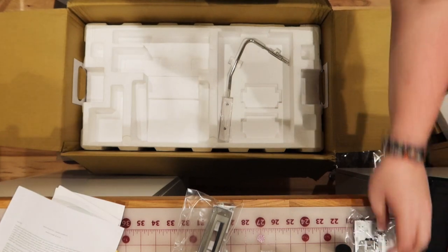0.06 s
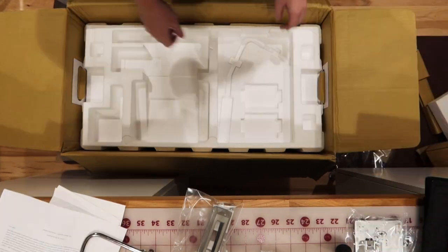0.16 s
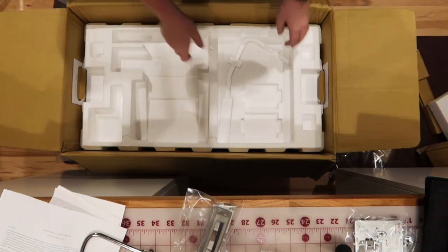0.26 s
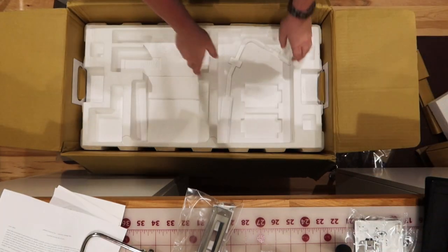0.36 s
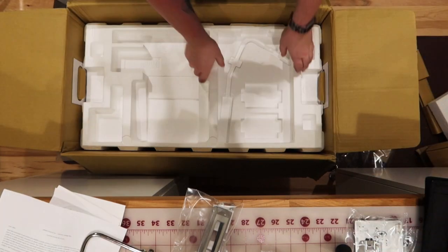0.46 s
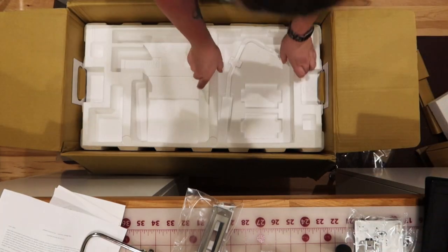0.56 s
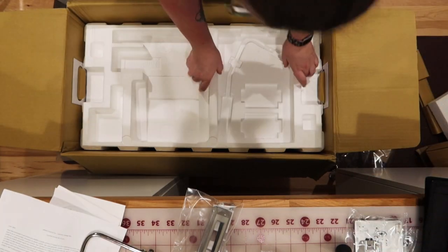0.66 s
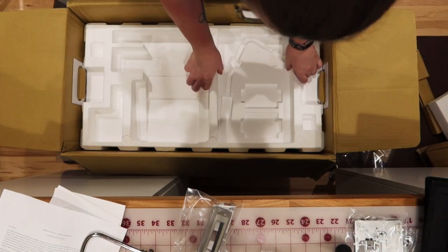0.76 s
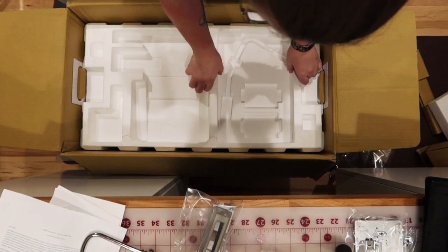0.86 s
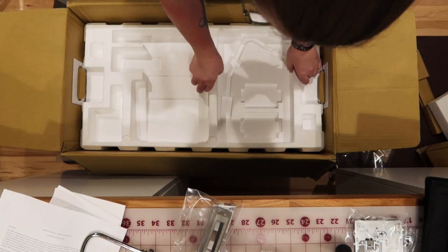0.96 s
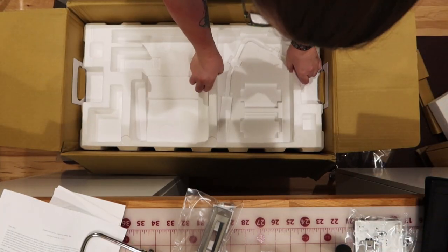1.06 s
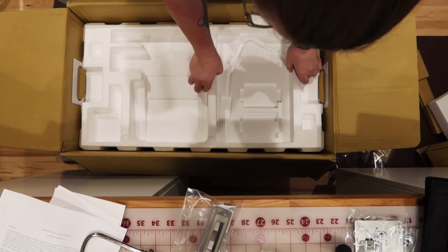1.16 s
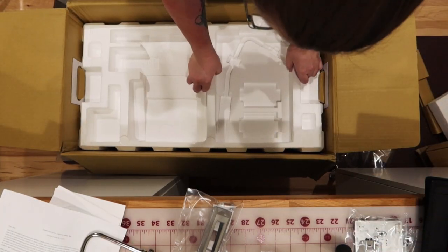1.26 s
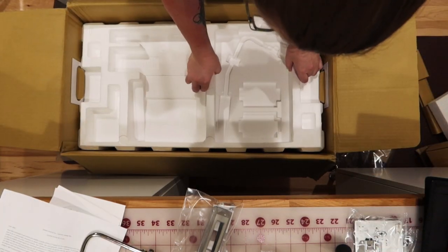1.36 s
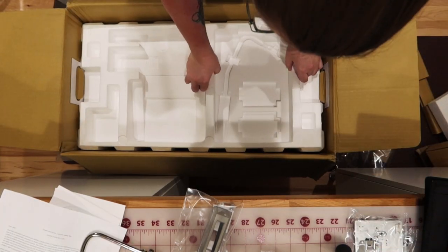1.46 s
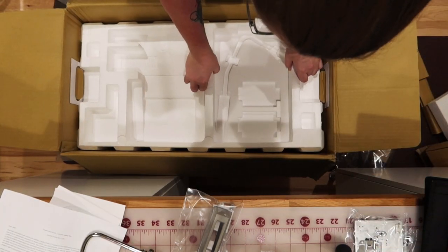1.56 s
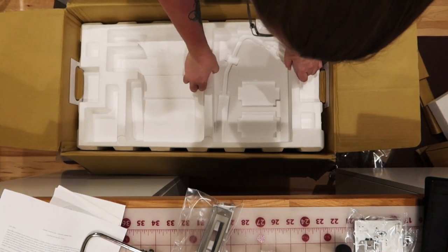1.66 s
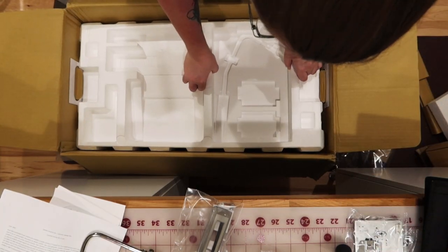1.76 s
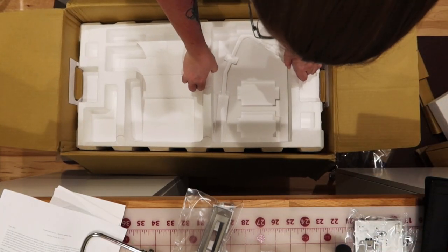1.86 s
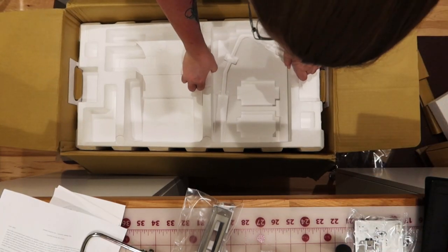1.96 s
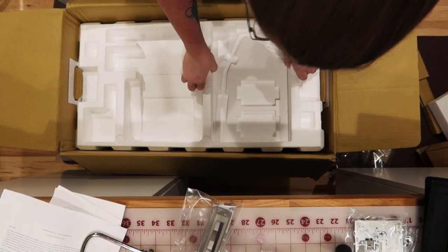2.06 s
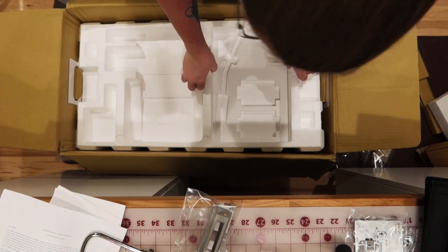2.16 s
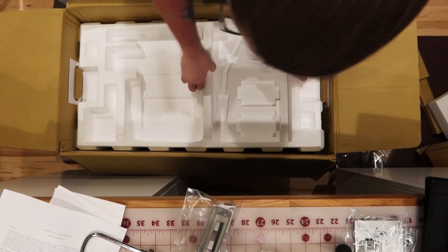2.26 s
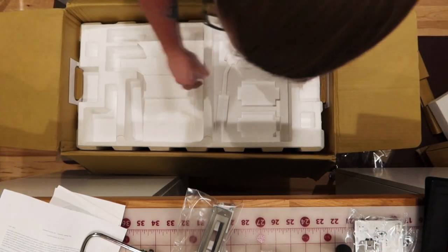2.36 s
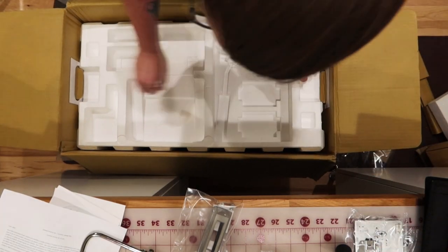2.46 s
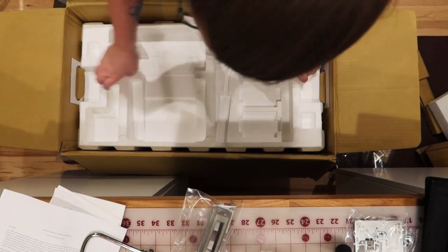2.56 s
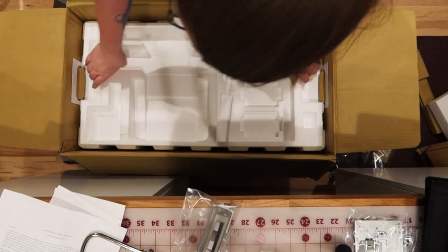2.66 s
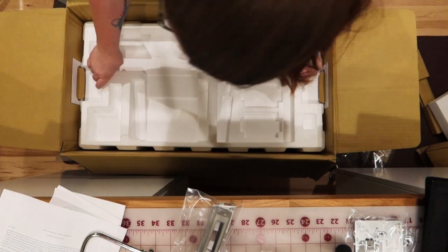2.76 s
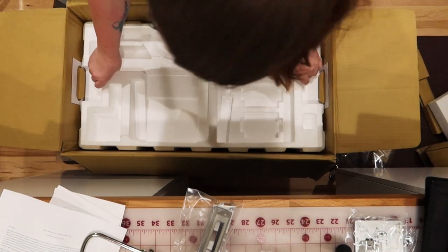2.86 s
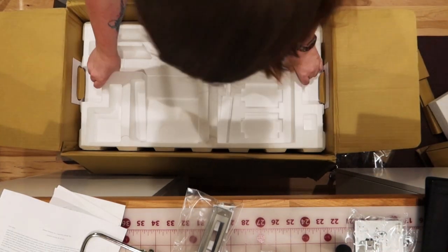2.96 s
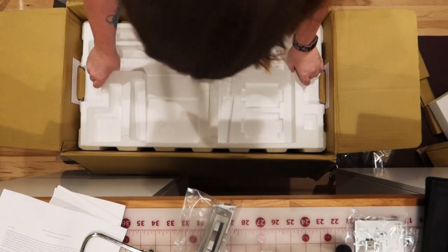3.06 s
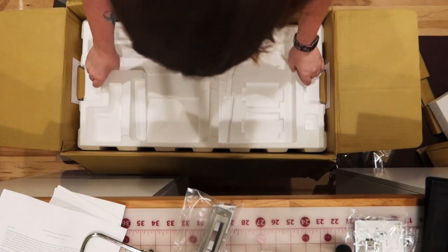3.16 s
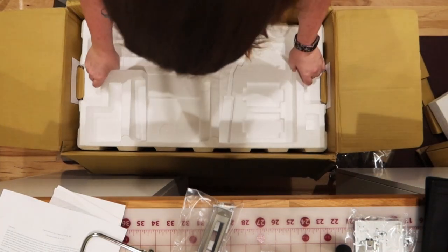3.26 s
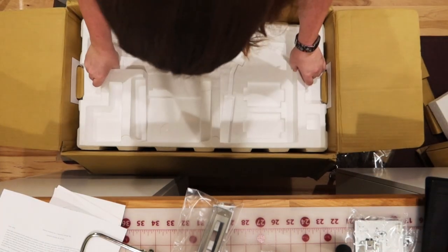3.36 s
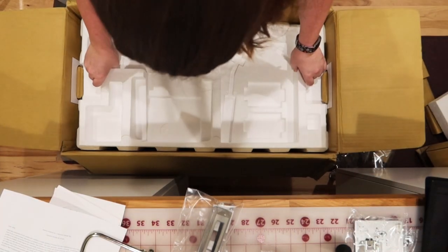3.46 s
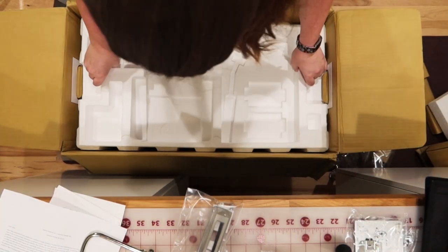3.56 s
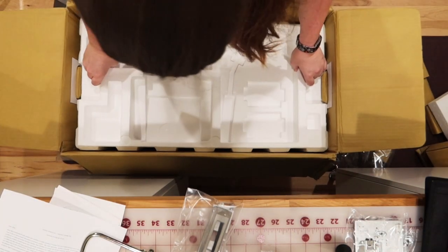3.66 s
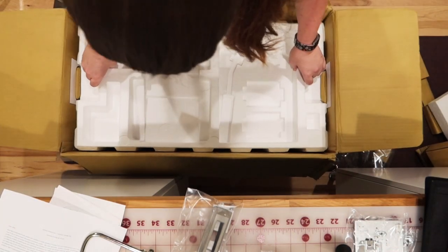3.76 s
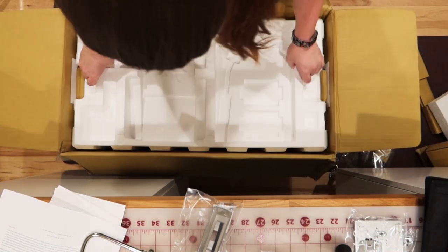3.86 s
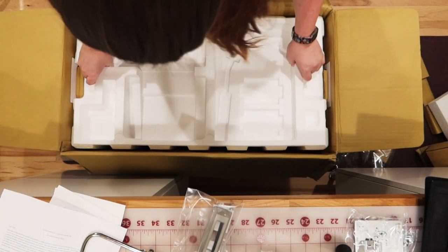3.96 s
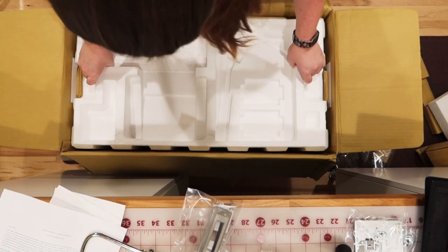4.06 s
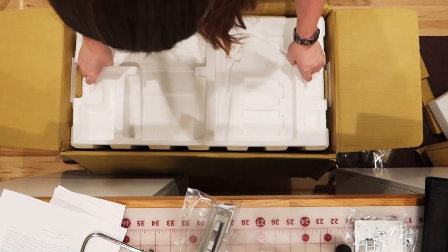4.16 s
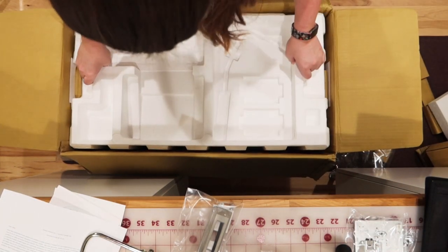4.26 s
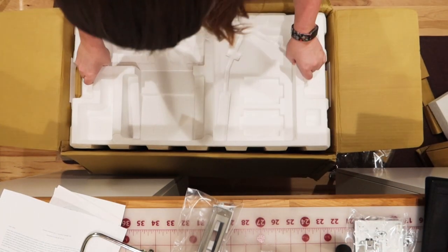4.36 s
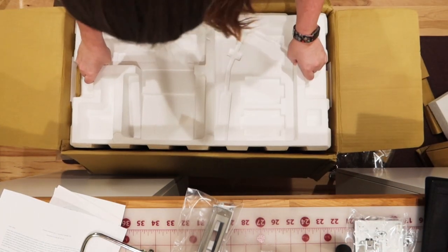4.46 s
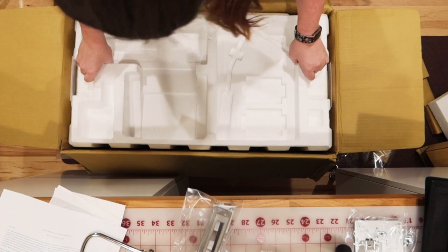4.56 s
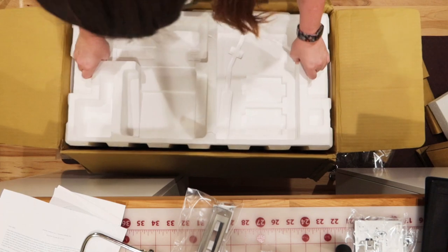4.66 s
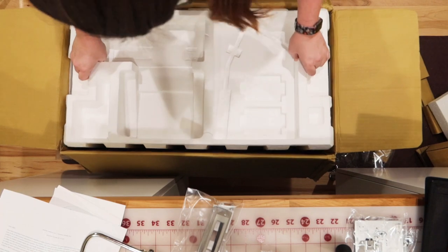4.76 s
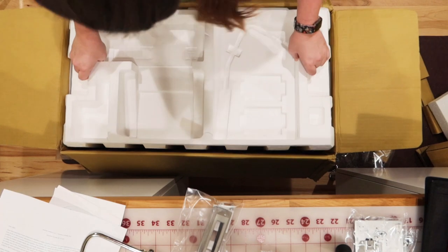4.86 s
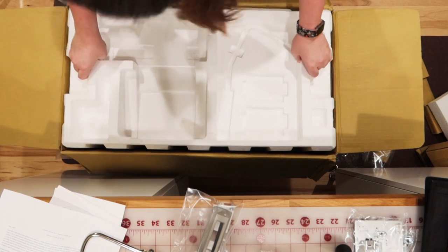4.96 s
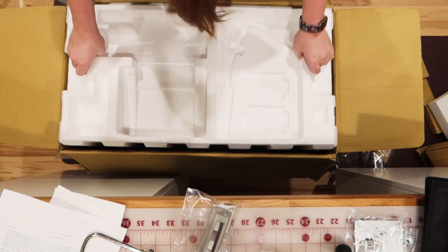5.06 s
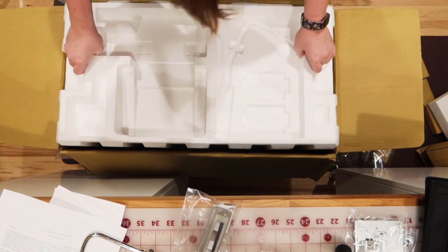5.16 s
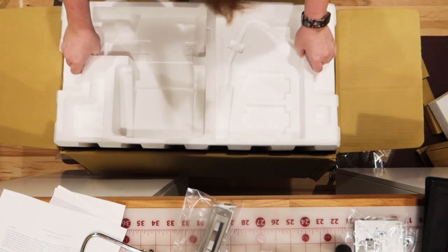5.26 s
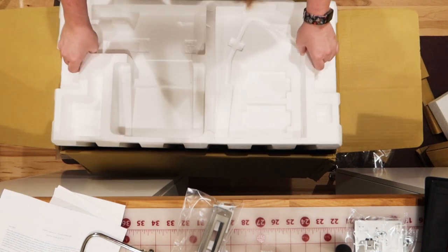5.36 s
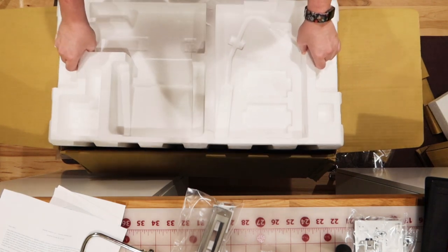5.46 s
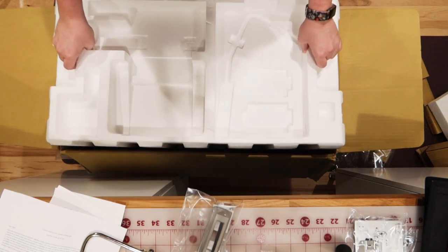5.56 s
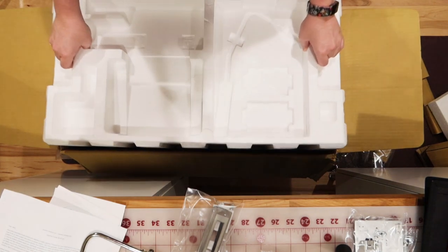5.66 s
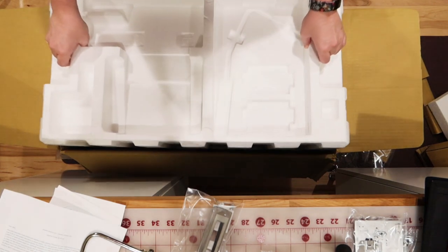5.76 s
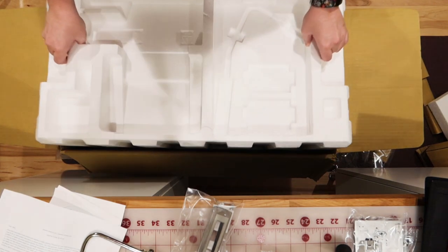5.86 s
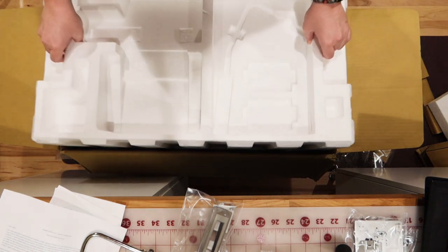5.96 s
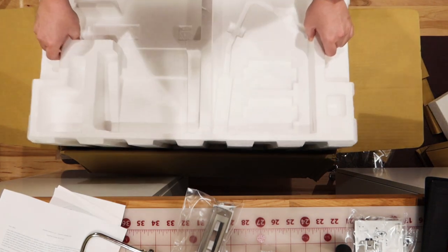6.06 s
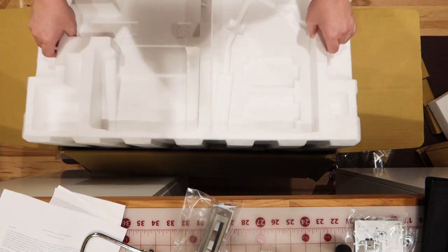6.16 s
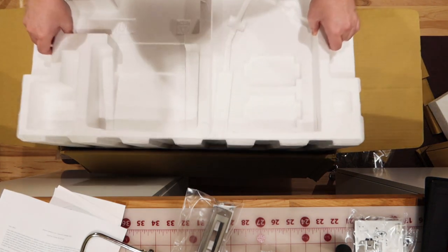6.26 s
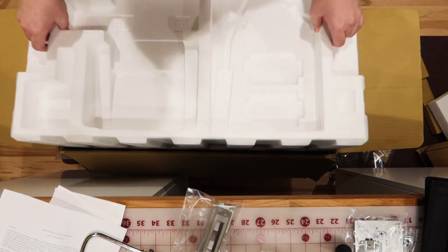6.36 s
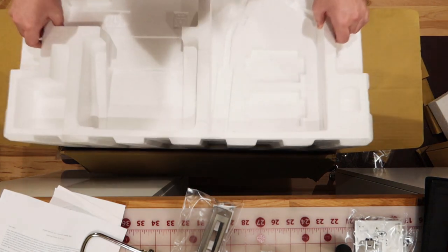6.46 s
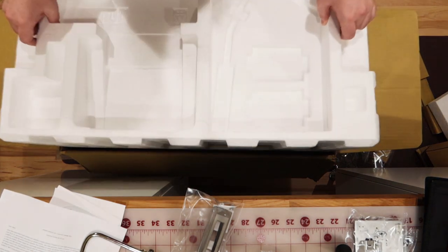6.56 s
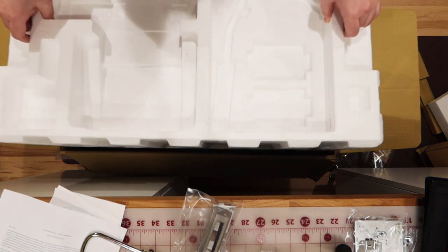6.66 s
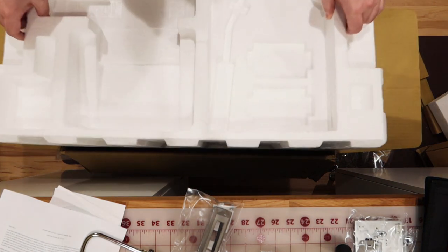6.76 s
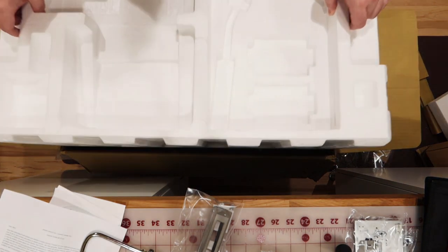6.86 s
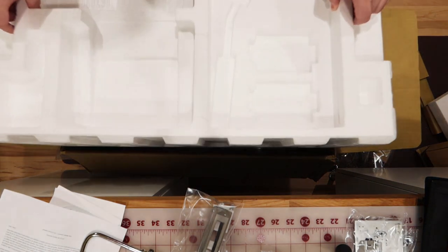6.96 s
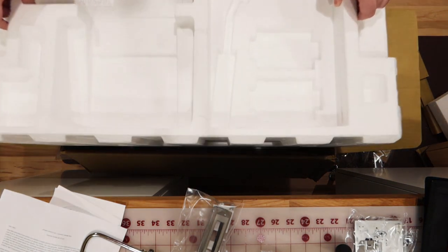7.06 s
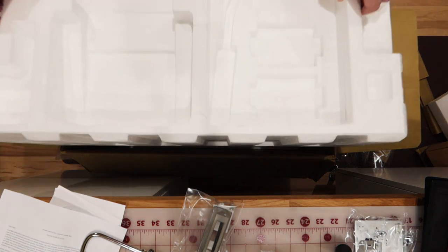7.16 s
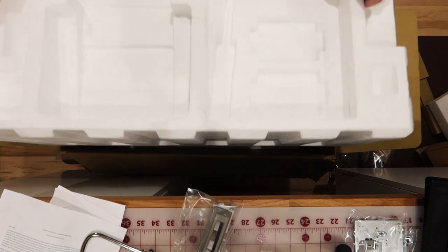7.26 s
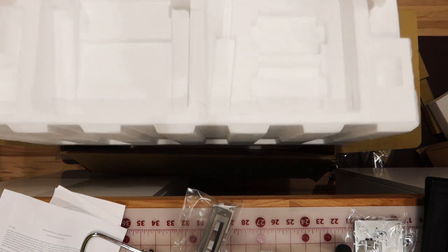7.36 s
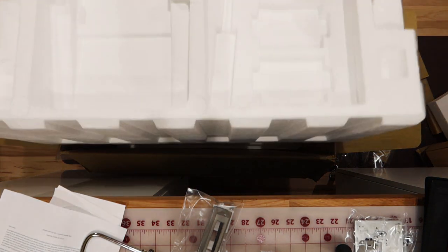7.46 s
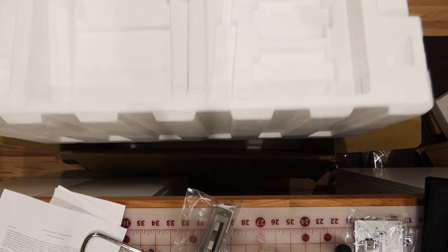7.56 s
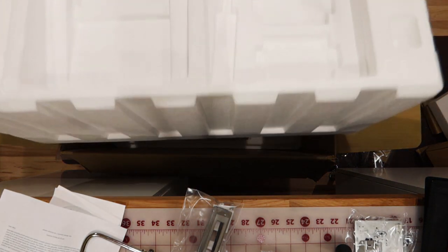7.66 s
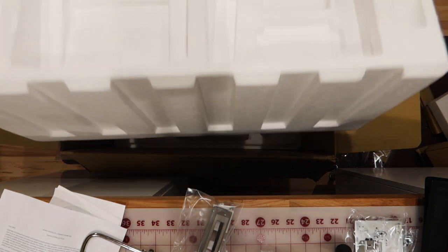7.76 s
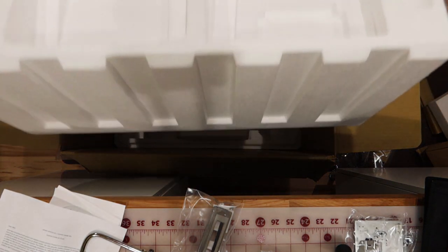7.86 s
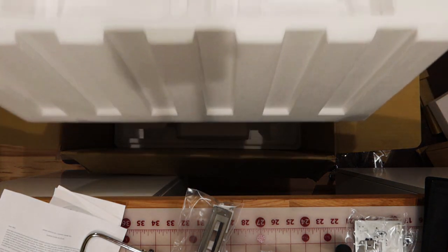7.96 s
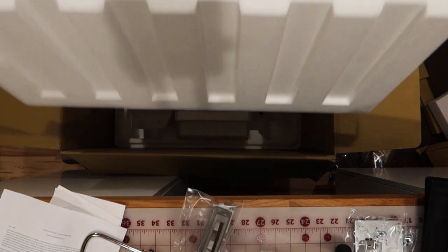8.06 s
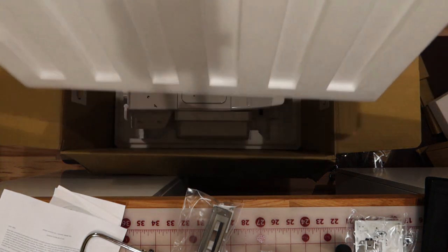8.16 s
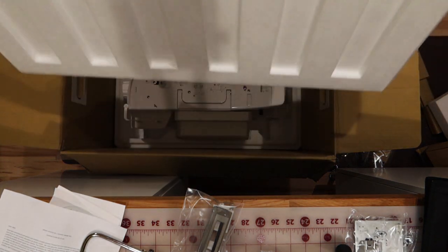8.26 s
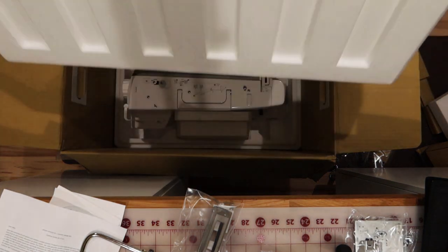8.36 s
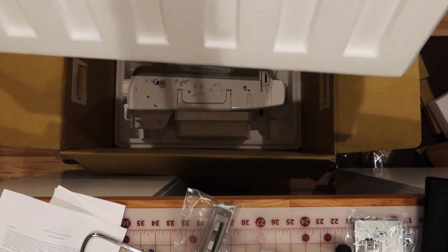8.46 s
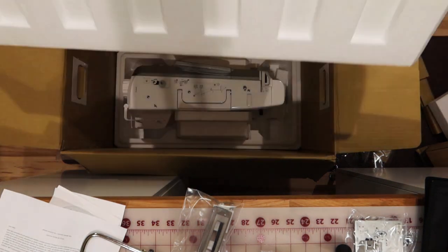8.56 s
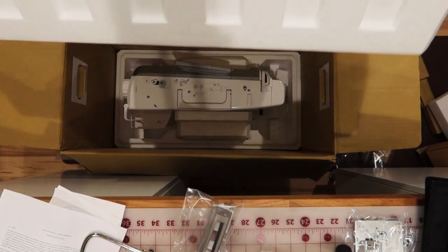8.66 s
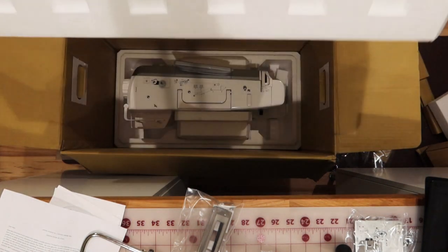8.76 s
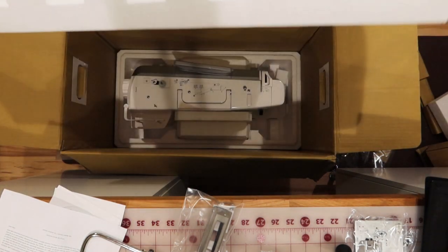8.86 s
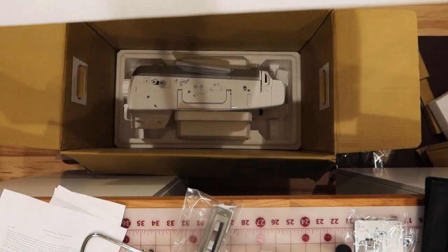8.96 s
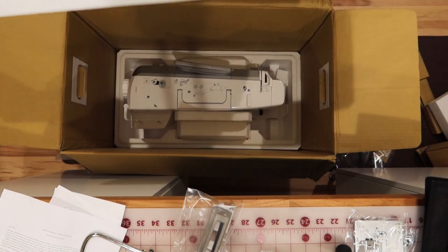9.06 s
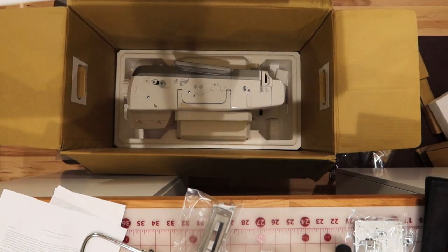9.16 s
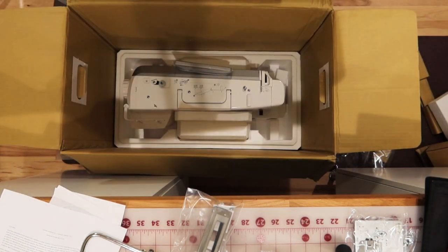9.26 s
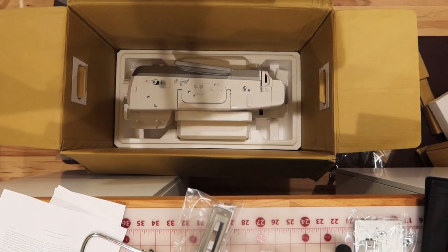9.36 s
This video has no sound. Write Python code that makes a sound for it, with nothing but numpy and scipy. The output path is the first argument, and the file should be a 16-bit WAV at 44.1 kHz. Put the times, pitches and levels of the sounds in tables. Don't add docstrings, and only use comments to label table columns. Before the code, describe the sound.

A quiet indoor room with low, soft room tone, heard by close stereo microphones. Two tiny dropouts cut the sound at about 0.23 and 0.27 seconds. From 0.5 hands bump and scuff foam, with hollow low thuds. From about 1 to 3.6 the foam rubs cardboard in gritty, hissing strokes with thin wavering squeaks; firmer bumps fall at 2.3, 2.8 and 2.9. At 3.7 it catches hard with bright snaps and squeaks, then a loud hollow knock at 3.94. Rasping strokes resume at 4.3 and 4.65, becoming stronger and nearly continuous from 5 to 6.6, over faint carton rumble. At 6.62 and 6.73 two loud, dry cardboard knocks land as the tray pops free, and the rasp abruptly stops. Light brushing, hollow flap taps and ticks follow, thinning after 7.5, with a small creak near 8.3, soft taps until 9.3, then quiet.

```python
import sys
import numpy as np
from scipy import signal
from scipy.fft import rfft, irfft, next_fast_len
from scipy.io import wavfile
from scipy.ndimage import uniform_filter1d, map_coordinates

SR = 44100
rng = np.random.default_rng(int(sys.argv[2]) if len(sys.argv) > 2 else 0)


def attenuation_scalar(level_db):
    decades = np.asarray(level_db, float) / 20
    return 10 ** decades


def master_out(mix):
    frames = np.transpose(np.atleast_2d(mix))
    ceiling = np.clip(frames, -1, 1)
    pcm = np.round(ceiling * 32767).astype(np.int16)
    wavfile.write(sys.argv[1], SR, pcm)


N = 414540

# (frequency [Hz], level [dB per Hz])
FOAM = [(180, -27), (300, -25), (351, -2), (611, 1), (897, 2), (1140, 4.5), (1910, 3), (2540, -0.5),
        (3670, -6), (9000, -23.5), (11700, -54.5), (19800, -120)]
# (frequency [Hz], level [dB per Hz])
HISS = [(1760, -9.5), (3000, -1.5), (3690, -2.5), (4960, -5), (7990, -8), (10000, -13.5), (13300, -18),
        (15600, -24.5)]
# (frequency [Hz], width [Hz], level [dB])
CARTON = [(215, 65, -1.5), (350, 34.6, 4), (432, 104, -2.5), (592, 80, -1.5), (872, 380, -8.5)]
# (time [s], length [s], first level [dB], last level [dB], hiss over rub [dB])
SWINGS = [(6.65, .065, -43, -38, -14), (6.737, 0.013, -25, -48, -1), (6.76, 0.15, -36.5, -40.5, -8),
          (6.92, 0.15, -45.5, -53, -5.5), (7.12, 0.068, -58, -50, -28), (7.305, 0.021, -53, -51, -7),
          (7.33, 0.067, -52, -62, -19), (7.43, 0.067, -53, -67, -22), (7.53, 0.26, -59, -55, -14.5),
          (7.849, 0.27, -49, -65, -8.5), (7.99, 0.21, -51, -53, -7.5), (8.16, 0.46, -49.5, -57.5, -18),
          (8.63, .1, -64, -61, -13), (8.75, 0.097, -46, -56, -20.5), (8.85, 0.12, -57, -60, -23),
          (9.0, 0.1, -58, -62, -24), (8.92, 0.062, -57, -63, -5), (9.305, 0.042, -64, -70, -29)]


def unit(x):
    return x / np.sqrt(np.mean(x ** 2) + 1e-20)


def along(points, hz):
    f, v = np.transpose(points)
    return np.interp(np.log(hz + 1), np.log(f + 1), v)


def wobble(rate):
    return map_coordinates(rng.standard_normal(N // 20), [np.arange(N) * rate / SR])


def drift(count, size):
    return size * np.cumsum(uniform_filter1d(rng.standard_normal(count), size=48))


def add(track, s, x):
    start = round(s * SR)
    track[start:start + len(x)] += x


def filtered(x, response):
    m = next_fast_len(N + 8192, real=True)
    spectrum = rfft(x, m) * response(np.fft.rfftfreq(m, 1 / SR))
    return irfft(spectrum, m)[..., :N]


def modes(table):
    def response(f):
        total = 0
        for k, (centre, width, db) in enumerate(table):
            damping = 1j * f * width
            total = total + (-1) ** k * attenuation_scalar(db) * damping / (centre * centre - f * f + damping)
        return total
    return response


def loudest(start, length, first_db, last_db, rise, fall):
    t = np.arange(0, N + 32, 32)[:, None] / SR
    held = first_db + (last_db - first_db) * np.clip((t - start) / np.maximum(length, 1e-3), 0, 1)
    early = np.maximum(start - t, 0)
    late = np.maximum(t - start - length, 0)
    db = held - rise * early - fall * late
    return np.interp(np.arange(N) / SR, t[:, 0], db.max(axis=1))


def singing(hz, t):
    # (start [s], end [s], first frequency [Hz], last frequency [Hz], height [dB])
    streaks = [(.59, 0.761, 5600, 5400, 7.5), (.58, .76, 3610, 3520, 5.5), (1.1, 1.249, 1410, 1390, 6.5),
               (1.25, 1.551, 1200, 1190, 5.5), (1.45, 2.121, 2120, 2150, 2.5), (1.6, 1.999, 1800, 1780, 6),
               (1.201, 2.0, 3700, 3530, 3.5), (1.3, 2.1, 4250, 4250, 3.5), (2.33, 2.749, 1830, 1840, 5),
               (2.36, 2.75, 2200, 2150, 5.5), (2.499, 2.88, 2900, 3000, 4.5), (3.05, 3.301, 1140, 1110, 5),
               (3.15, 3.351, 1390, 1440, 6.5), (3.299, 3.661, 1250, 1210, 4.5), (3.25, 3.5, 3530, 3520, 8),
               (3.1, 3.45, 1940, 2020, 4.5), (4.252, 4.47, 1010, 1060, 5.5), (4.619, 4.8, 1000, 1020, 5.5),
               (4.62, 5.1, 3620, 3700, 6), (4.9, 5.602, 1120, 1160, 4.5), (4.95, 5.45, 1720, 1600, 4.5),
               (5.151, 5.6, 2220, 2110, 7), (5.4, 6.198, 3700, 3660, 3.5), (5.751, 5.949, 2050, 1940, 6),
               (5.92, 6.18, 1900, 1873, 6.5), (5.85, 6.001, 1520, 1500, 6), (6.14, 6.26, 1350, 1290, 3.5),
               (6.27, 6.52, 1470, 1480, 6), (6.42, 6.61, 1950, 2050, 7), (6.46, 6.56, 3150, 3180, 5)]
    half_width_hz, fade_s, waver_share = 50.3, .03, .012
    lift = np.zeros((len(hz), len(t)))
    chance = rng.standard_normal((len(streaks), len(t)))
    waver = 1 + waver_share * unit(uniform_filter1d(chance, size=4, axis=1))
    for (start, end, first, last, db), sway in zip(streaks, waver):
        centre = sway * np.interp(t, [start, end], [first, last])
        on = np.clip(np.minimum(t - start, end - t) / fade_s + .5, 0, 1)
        lift += db * on * np.exp(-((hz[:, None] - centre) / half_width_hz) ** 2)
    return lift


def grit(response, patchy_db, grain_db, rate, ridge_db=0, sings=False):
    # (time [s], frequency [Hz])
    sheen = [(1.3, 5050), (1.8, 3700), (2.5, 4090), (3.2, 5320), (4.3, 5480), (4.75, 5700), (5.05, 3700),
             (5.3, 4230), (5.8, 4300), (6.15, 4720), (6.42, 2950), (6.6, 4250)]
    # (frequency [Hz], side over mid [dB])
    sides = [(60, -29.5), (110, -28), (200, -12), (380, -15), (700, -18), (1290, -22), (2380, -13.5),
             (4400, -8.5), (8120, -2), (15000, 7)]
    ridge_share = .25
    grains = rng.standard_normal((2, N)) * attenuation_scalar(grain_db * wobble(rate))
    hz, t, z = signal.stft(grains, SR, nperseg=2048)
    field = uniform_filter1d(rng.standard_normal(z.shape[1:]), size=2, axis=0)
    field = uniform_filter1d(field, size=6, axis=1)
    ridge_hz = np.interp(t, *np.transpose(sheen))
    ridge = 1 / (1 + ((hz[:, None] / ridge_hz - 1) / ridge_share) ** 2)
    lift_db = patchy_db * unit(field) + ridge_db * ridge
    if sings:
        lift_db = lift_db + singing(hz, t)
    colour = response(hz) * np.array([np.ones(len(hz)), attenuation_scalar(along(sides, hz))])
    pair = signal.istft(z * attenuation_scalar(lift_db) * colour[..., None], nperseg=2048)[1][:, :N]
    return pair / np.sqrt(np.mean(pair[0] ** 2))


def air():
    # (frequency [Hz], level [dB per Hz])
    tone = [(15, -49), (30, 1.5), (230, 8), (600, 0), (2300, -6.5), (4000, -12), (8000, -22.5),
            (12500, -33)]
    top_hz = 12600
    tone_noise = grit(lambda f: attenuation_scalar(along(tone, f)) * (f < top_hz), patchy_db=2.5, grain_db=1.0, rate=140)
    return attenuation_scalar(-60.5) * tone_noise


def room(x, t60s):
    hz, t, z = signal.stft(rng.standard_normal(SR // 2), SR, nperseg=256)
    decay = attenuation_scalar(-60 * t / along(t60s, hz)[:, None])
    tail = signal.istft(z * decay, nperseg=256)[1]
    return signal.oaconvolve(x, tail / np.linalg.norm(tail))[:N]


def echoes(hits):
    # (frequency [Hz], t60 [s])
    nearby = [(100, .06), (10000, .025)]
    # (frequency [Hz], t60 [s])
    far = [(100, 0.28), (1000, 0.21), (10000, 0.034)]
    # (frequency [Hz], side over mid [dB])
    spread = [(100, -35), (400, -27), (1500, -19), (3000, -12), (6000, -5), (12000, 2)]
    unlike = filtered(room(hits, nearby), lambda f: attenuation_scalar(along(spread, f)))
    return np.array([hits + attenuation_scalar(-14.0) * room(hits, far), unlike])


def ticks():
    # (time [s], peak level [dB])
    snaps = [(0.5975, -53.5), (0.6444, -44), (0.6694, -45), (0.8747, -38), (2.2618, -49), (3.713, -19),
             (3.7219, -8), (3.762, -12), (4.256, -34), (4.6503, -43), (4.6614, -14.5), (6.614, -13),
             (6.73, -41.5), (7.197, -41), (7.427, -50.5), (8.4467, -40), (.528, -54), (2.943, -39),
             (3.704, -34), (3.9417, -30), (7.1495, -52), (7.167, -49), (7.204, -36), (7.3067, -40),
             (7.5297, -59), (7.5466, -45), (7.7212, -51), (7.989, -45), (8.033, -48), (8.1069, -46),
             (8.13, -43), (8.3837, -57), (8.4092, -51), (8.438, -52), (8.7359, -51), (8.7464, -48),
             (8.7569, -50), (8.8867, -57), (8.921, -57), (7.298, -52), (7.335, -47), (7.402, -49),
             (7.516, -51), (7.675, -50), (8.387, -52), (8.472, -50.5), (8.496, -52), (8.54, -55)]
    creak_s, creak_gap_s, creak_db = 8.285, .0143, -45
    out, t = np.zeros(N + SR), np.arange(SR // 20) / SR
    sizes = rng.standard_normal(size=6)
    creak = [(creak_s + k * creak_gap_s, creak_db + size) for k, size in enumerate(sizes)]
    for s, db in snaps + creak:
        noise = uniform_filter1d(rng.standard_normal(len(t)), size=3)
        add(out, s, attenuation_scalar(db - 4.5 - 60 * t / 0.015) * np.diff(noise, prepend=0))
    return out[:N]


def squeaks():
    # (time [s], peak level [dB], pitch [Hz], length [s], width [Hz])
    catches = [(.005, -49, 1312, 0.051, 840), (0.762, -34, 2490, 0.05, 1810),
               (0.863, -40, 2600, 0.024, 1500), (2.779, -37, 2950, 0.04, 650),
               (3.706, -26, 2700, 0.021, 830), (3.709, -21, 4880, 0.036, 2460),
               (3.733, -28.5, 3500, 0.02, 720), (3.765, -24.5, 5840, 0.027, 1000),
               (3.854, -34, 2496, 0.046, 1500), (3.7225, -8.5, 2690, 0.012, 900),
               (3.722, -12, 1940, 0.013, 220), (3.73, -19.5, 3120, 0.063, 700),
               (3.752, -17.5, 1175, 0.039, 190), (3.761, -10.5, 4120, 0.012, 1276),
               (3.76, -19, 1700, 0.022, 230), (3.775, -26, 4150, 0.052, 700),
               (3.881, -23, 2880, 0.014, 440), (6.616, -12.5, 4190, 0.0071, 1200),
               (6.617, -17.5, 2320, 0.0085, 914), (6.733, -20.5, 3400, 0.011, 640),
               (6.731, -22, 5340, 0.0112, 1700), (6.722, -33, 2400, 0.007, 700),
               (6.744, -24, 3510, 0.029, 900), (6.778, -32, 3500, 0.049, 890),
               (6.896, -35, 3820, 0.027, 400), (7.856, -40, 1950, .013, 1100), (8.1, -54, 2050, 0.08, 900),
               (8.17, -48, 1000, 0.18, 330), (8.27, -48, 1200, 0.18, 1000), (8.474, -45, 1313, 0.057, 1504),
               (8.762, -48, 530, 0.13, 400), (6.997, -42.5, 1800, 0.066, 702),
               (7.192, -51, 2450, 0.05, 900), (8.62, -53, 1200, .09, 250), (8.745, -50, 2300, 0.045, 1000),
               (8.916, -46.5, 670, .05, 370), (8.928, -60, 5600, .09, 900),
               (0.8665, -48, 10500, .025, 3600), (0.661, -53, 11500, .022, 3600),
               (7.187, -48, 5300, .008, 1200), (0.775, -45.5, 5200, 0.05, 2000),
               (8.755, -48, 3000, .022, 1300), (8.63, -60, 3800, .05, 460)]
    out, t = np.zeros(N + SR), np.arange(SR // 3) / SR
    for s, db, hz, length, width in catches:
        slow = uniform_filter1d(rng.standard_normal((2, len(t))), size=round(SR / abs(width)), axis=1)
        a, b = unit(uniform_filter1d(slow, size=round(SR / abs(2 * width)), axis=1))
        u = t / length
        swell = u * np.exp(-3 * u * u)
        turn = 2 * np.pi * hz * t
        add(out, s - .004, attenuation_scalar(db + 6.5) * swell * (a * np.sin(turn) + b * np.cos(turn)))
    return out[:N]


def scuffs():
    # (time [s], peak level [dB], hiss level [dB])
    catches = [(0.572, -39, -24), (0.639, -34, -18.5), (0.765, -29, -12), (0.875, -36, -14.5),
               (1.036, -30, -13), (2.262, -24, -5.5), (2.3, -27, -29), (2.945, -43, 6.5), (3.706, -28, -21),
               (4.26, -34.5, 9.5), (4.657, -32, -5), (5.662, -18, -20), (7.006, -28, 0.5),
               (7.092, -31, -25), (7.169, -34, -23), (7.196, -29, -10), (7.309, -36, -17), (7.427, -34, -8),
               (7.55, -33, -30), (7.646, -39, -31), (7.856, -38, -21), (7.888, -31, -28), (7.987, -44, -25),
               (8.408, -42, -24), (8.45, -29.5, -17), (8.635, -41, -25), (8.736, -41, -19),
               (8.886, -38, -18), (8.925, -39, -18), (9.298, -49, -24.5)]
    burst, t = np.zeros((2, N + SR)), np.arange(SR // 4) / SR
    for s, db, hiss_db in catches:
        chance = rng.standard_normal((2, len(t)))
        decay = attenuation_scalar(-60 * t / 0.031) + 0.36 * attenuation_scalar(-60 * t / 0.17)
        shape = decay * (1 - np.exp(-t / 0.0021))
        add(burst[0], s - .001, attenuation_scalar(db - 5.0) * shape * chance[0])
        add(burst[1], s - .001, attenuation_scalar(db + hiss_db - 2.5) * shape * chance[1])
    return filtered(burst[:, :N], lambda f: attenuation_scalar([along(FOAM, f), along(HISS, f)])).sum(axis=0)


def raps():
    # (time [s], peak level [dB], pitch [Hz])
    contacts = [(.527, -46, 570), (.594, -37, 670), (.642, -30, 740), (2.303, -27, 600),
                (2.943, -29.5, 525), (7.168, -33, 815), (7.31, -31, 835), (7.427, -42, 900),
                (7.644, -39, 660), (7.988, -31.5, 660), (8.411, -35, 965), (8.736, -35, 690),
                (8.886, -42, 520), (8.927, -43, 692), (9.298, -42, 550), (9.314, -44, 590),
                (3.942, -17, 1750), (6.8, -12, 566)]
    fade_cycles = 11.6
    out, t = np.zeros(N + SR), np.arange(SR // 20) / SR
    for s, db, hz in contacts:
        for ratio, level in [(1, 0), (3, -7.5)]:  # (frequency ratio, dB)
            fade = attenuation_scalar(db + level - 60 * t * ratio * hz / fade_cycles)
            add(out, s, fade * np.sin(2 * np.pi * ratio * hz * t))
    return out[:N]


def bumps():
    # (time [s], peak level [dB], pitch [Hz], walls level [dB], t60 [s])
    jolts = [(0.526, -20, 107, -27, 0.059), (0.642, -22, 151, -11.5, 0.037), (0.81, -24, 146, -14.5, 0.067),
             (0.989, -30.5, 133, -15, 0.055), (1.19, -39, 390, 2, .055), (1.379, -29.5, 384, -6.5, 0.043),
             (2.259, -15.5, 206, -10.5, 0.047), (2.3, -19.5, 150, -4.5, 0.055),
             (2.777, -22.5, 89, -41, 0.1), (2.82, -26.5, 88, -34, .09), (2.943, -19, 208, -16, 0.056),
             (3.306, -31.5, 380, -7.5, .055), (3.406, -26.5, 370, -3, 0.052),
             (3.673, -20.5, 105, -1.5, .09), (3.772, -15.5, 90.7, -3, 0.11), (3.79, -21.5, 88, -24.5, 0.11),
             (3.809, -24.5, 89, -17, .1), (3.994, -17.5, 377, -11, .06), (4.678, -20.5, 99, -24, 0.034),
             (4.887, -38, 91, -9, 0.12), (5.36, -33, 404, -11, .055), (5.661, -30, 133, -2, 0.067)]
    # (time [s], peak level [dB], pitch [Hz], walls level [dB])
    taps = [(6.6128, -13, 524, -12.5), (6.7248, -14, 334, -9), (7.209, -24.5, 331, -9),
            (7.334, -28.5, 460, -2.5), (8.489, -42, 350, -3), (8.925, -42, 455, -5),
            (6.654, -19.5, 590, -10), (6.679, -17.5, 376, -4), (6.75, -14, 157, -3), (6.771, -19.5, 313, 2),
            (6.797, -17.5, 163, -8), (6.971, -30, 345, -1.5), (6.998, -31.5, 350, -9),
            (7.093, -29.5, 337, -5.5), (7.169, -34, 265, 2), (7.198, -29, 337, -28), (7.309, -28, 278, 0),
            (7.433, -35, 335, -11), (7.549, -29.5, 338, -6.5), (7.644, -31.5, 693, -14),
            (7.862, -32, 249, 0.5), (7.89, -36.5, 224, 2), (7.973, -36.5, 350, 4), (8.41, -44.5, 350, 4),
            (8.444, -32.5, 363, -1), (8.741, -39, 690, -25), (8.886, -42.5, 440, 3), (9.292, -43, 184, -6)]
    overtone, overtone_db = 1.757, -8
    ring, puff, t = np.zeros(N + SR), np.zeros(N + SR), np.arange(SR // 4) / SR
    rise = 1 - np.exp(-t / 0.0026)
    timed_taps = [(*row, 0.97 / np.sqrt(row[2])) for row in taps]
    for s, db, hz, walls_db, t60 in jolts + timed_taps:
        turn = 2 * np.pi * hz * t + drift(len(t), size=.02)
        wall = np.sin(turn) + attenuation_scalar(overtone_db) * np.sin(overtone * turn)
        add(ring, s, attenuation_scalar(db - 0.5 - 60 * (t / t60) ** 1.16) * rise * wall)
        add(puff, s, attenuation_scalar(db + walls_db + 16.0 - 60 * t / 0.13) * rise * rng.standard_normal(len(t)))
    return ring[:N] + filtered(puff[:N], lambda f: modes(CARTON)(f) / (1 + 1j * f / 1800))


def knocks():
    # (time [s], peak level [dB], crack level [dB], pressed [s], t60 [s])
    blows = [
        (3.9419, -1.5, -20, .039, .035),
        (6.6162, -3, -11, .025, .035),
        (6.7278, -2, -23, .013, .02),
    ]
    # (frequency [Hz], level [dB])
    flaps = [
        [(150, -14), (218, -7), (290, -4), (368, 0.5), (409, -3), (582, -9.5), (916, -9.5), (2500, -10)],
        [(150, -6), (197, -10), (257, 1), (367, 4), (462, 0), (560, -2.5), (748, -5), (1092, -7)],
        [(130, -7.5), (316, 4), (500, -7), (529, -5.5), (1100, -10), (1570, -9)],
    ]
    out, thud, crack = np.zeros((3, N + SR))
    t = np.arange(SR // 5) / SR
    for (s, db, crack_db, pressed, t60), flap in zip(blows, flaps):
        decay = attenuation_scalar(-60 * np.maximum(t - pressed, 0) / t60 - 70 * t)
        shape = decay * (1 - np.exp(-t / .001))
        drum = np.zeros(len(t))
        for hz, level in flap:
            turn = -2 * np.pi * hz * t + drift(len(t), size=.002)
            drum += attenuation_scalar(level - 1.18 * hz * t) * np.sin(turn)
        add(out, s, attenuation_scalar(db - 4.5) * shape * drum)
        add(crack, s, attenuation_scalar(db + crack_db + 13 - 60 * t / 0.01) * rng.standard_normal(len(t)))
        add(thud, s, attenuation_scalar(db - 7.0) * shape * rng.standard_normal(len(t)))
    sharp = modes([(1100, 310, -9.0), (2600, 1800, -16.5), (4640, 590, -4.5)])
    dull = modes([(350, 410, -0.56)])
    return out[:N] + filtered([thud[:N], crack[:N]], lambda f: np.array([dull(f) ** 2, sharp(f)])).sum(axis=0)


def slips():
    slips_per_s, slip_s = 75, .003
    held_db, free_db = -7, -2.5
    when, chance = rng.random((N * 100 // SR, 2)).T
    start = (np.cumsum(-np.log(when) / slips_per_s) * SR).astype(int)
    inside = start < N
    jumps = np.bincount(start[inside], 2 * chance[inside] ** 2, N)
    depth = attenuation_scalar(np.where(np.arange(N) / SR < SWINGS[0][0], held_db, free_db))
    return 1 + depth * signal.lfilter([1], [1, -np.exp(-1 / (slip_s * SR))], jumps)


def rubbing():
    # (time [s], length [s], first level [dB], last level [dB], hiss over rub [dB])
    pulls = [(0, 0.028, -52, -65, -28), (0.587, .31, -49.5, -48, -8), (0.9, 0.18, -67.5, -45.5, -5),
             (1.033, 0.43, -45.5, -39.5, -15), (1.197, 0.094, -57.5, -47.5, 1.5),
             (1.36, 0.7, -42, -40, -14.5), (2.107, 0.11, -41, -53.5, -17.5), (2.341, 0.27, -40, -38.5, -12),
             (2.636, 0.17, -41.5, -38.5, -8), (2.828, 0.28, -41, -65, -11), (3.002, 0.19, -50, -44.5, -14),
             (3.207, 0.46, -43.5, -36.5, -10.5), (3.728, 0.19, -18.5, -42.5, -10.5),
             (3.852, 0.094, -29, -29, -6), (3.937, 0.24, -34.5, -43, -11), (4.27, 0.12, -35, -33, -4.5),
             (4.415, .15, -40, -40.5, -13), (4.648, 0.067, -34, -31, -4), (4.745, 0.17, -33, -35.5, -4.5),
             (4.951, 0.35, -39, -32.5, -6), (5.321, 0.28, -32.5, -35.5, -5.5),
             (5.687, 0.054, -34, -34, -1.5), (5.621, 1, -33, -30, -7)]
    # (time [s], walls level [dB], thrum level [dB])
    flexes = [(.02, -61, -65), (.6, -47, -49), (.7, -44, -55), (.84, -50, -48), (1.14, -36, -50.5),
              (1.42, -38.5, -67), (1.8, -40.5, -64), (2.299, -37.5, -42.5), (2.4, -43, -54),
              (2.77, -42.5, -39.5), (2.97, -40.5, -50.5), (3.47, -39.5, -52.5), (3.701, -30.5, -43.5),
              (3.91, -32.5, -39), (4.3, -44, -48), (4.679, -34, -42), (4.87, -35.5, -43),
              (5.63, -36.5, -49), (4.5, -44, -51.5), (5.1, -44, -45.5), (6.73, -30.5, -33),
              (7.21, -39, -53.5), (7.11, -42, -49.5), (7.44, -49.5, -54), (7.658, -36, -53.5),
              (7.87, -40, -57), (7.96, -46, -54.5), (8.48, -50, -71), (8.87, -56, -72),
              (9.31, -54.5, -65.5)]
    # (frequency [Hz], level [dB per Hz])
    floor = [(25, -18.5), (60, 1), (100, 5.5), (150, -4), (220, -8.5), (400, -57.5)]
    grip_db_per_s, let_go_db_per_s = 506, 194.5
    pop_db_per_s = 899
    hiss_edge, hiss_lag_s = 2, .03
    bend_db_per_s, relax_db_per_s, boom_db_per_s = 216, 115.5, 92.5

    s, length, first, last, skin = np.transpose(pulls + SWINGS)
    fall = np.where(s == pulls[-1][0], pop_db_per_s, let_go_db_per_s)
    rub_db = loudest(s, length, first, last, grip_db_per_s, fall)
    hiss_db = loudest(s, length, first + skin, last + skin, hiss_edge * grip_db_per_s, hiss_edge * fall)
    hiss_db = np.minimum(uniform_filter1d(hiss_db, size=round(hiss_lag_s * SR)), rub_db)

    s, bend, boom = np.transpose(flexes)
    shaken_db = 0.45 * (rub_db + 40)
    bend_db = loudest(s, 0, bend, bend, bend_db_per_s, relax_db_per_s)
    boom_db = loudest(s, 0, boom, boom, bend_db_per_s, boom_db_per_s)
    carton_db = np.maximum(-49 + shaken_db, bend_db)
    thrum_db = np.maximum(-61.5 + shaken_db, boom_db)

    judder = wobble(24)
    rasp = grit(lambda f: attenuation_scalar(along(FOAM, f)), patchy_db=2.5, grain_db=2.0, rate=540, sings=True)
    rasp = attenuation_scalar(rub_db + 0.6 * judder) * rasp
    hiss = grit(lambda f: attenuation_scalar(along(HISS, f)), patchy_db=3.0, grain_db=0.6, rate=320, ridge_db=2.5, sings=True)
    hiss = attenuation_scalar(hiss_db + 1.8 * judder + 0.49 * wobble(6.2)) * hiss
    walls = grit(lambda f: modes(CARTON)(f) / (1 + (f / 2500) ** 2), patchy_db=2.5, grain_db=1.5, rate=36)
    walls = attenuation_scalar(carton_db + 1.25 * judder) * walls
    thrum = attenuation_scalar(thrum_db) * grit(lambda f: attenuation_scalar(along(floor, f)), patchy_db=0.8, grain_db=0.5, rate=5.8)
    return slips() * (attenuation_scalar(-2.0) * rasp + hiss) + attenuation_scalar(-2.0) * walls + attenuation_scalar(5.0) * thrum


def scene():
    hits = bumps() + knocks() + squeaks() + scuffs() + ticks() + raps()
    mid, side = air() + echoes(hits) + rubbing()
    return np.array([mid + side, mid - side])


def top_cut(x):
    return signal.sosfilt(signal.butter(12, 15760, fs=SR, output="sos"), x)


def record(dry):
    # (start [s], end [s])
    dropouts = [
        (.229, .249),
        (.269, .289),
    ]
    low_hz, top_hz, fade_s = 33.8, 15760, 0.00092
    t = np.arange(N) / SR
    live = np.ones(N)
    for start, end in dropouts:
        live *= np.clip(np.maximum(start - t, t - end) / fade_s, 0, 1)
    clipped = dry / (1 + np.abs(dry / .99) ** 8) ** (1 / 8)
    heard = filtered(clipped, lambda f: (f < top_hz) * (1j * f / (low_hz + 1j * f)) ** 2)
    return top_cut(heard * live)


dry = scene()
out = record(dry)
master_out(out)
```